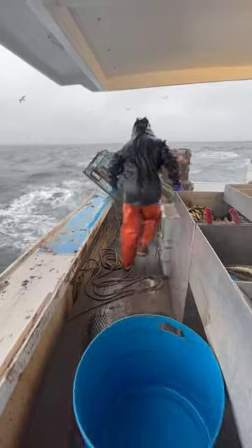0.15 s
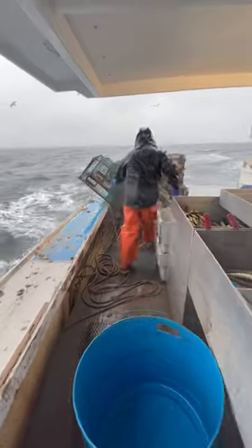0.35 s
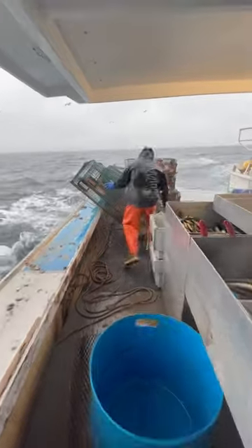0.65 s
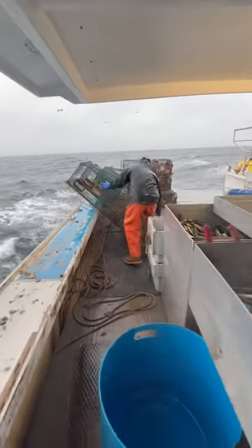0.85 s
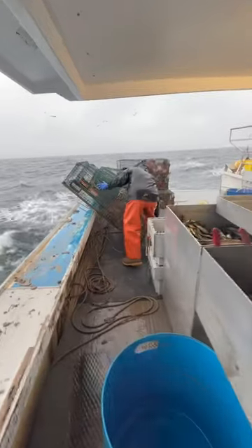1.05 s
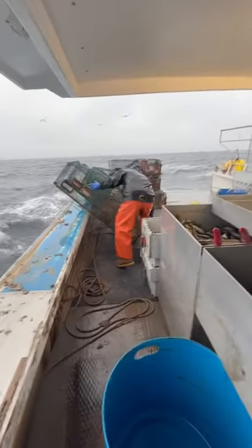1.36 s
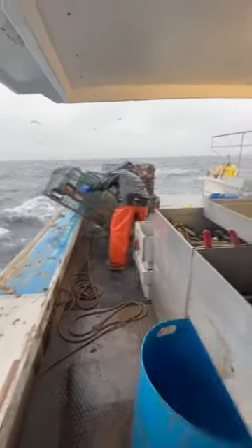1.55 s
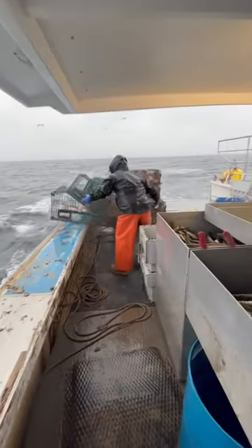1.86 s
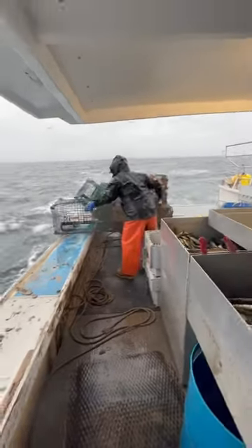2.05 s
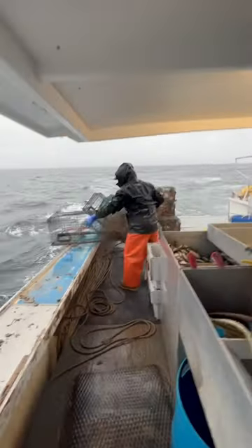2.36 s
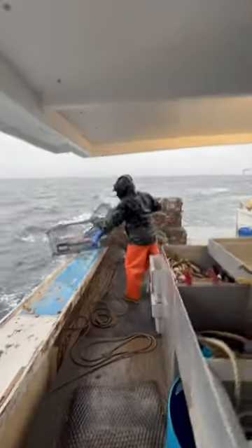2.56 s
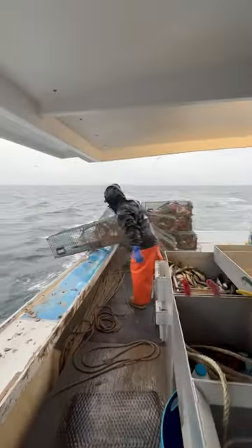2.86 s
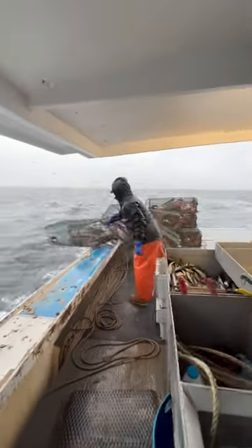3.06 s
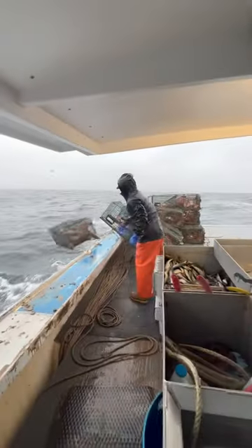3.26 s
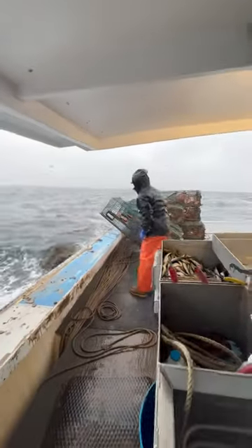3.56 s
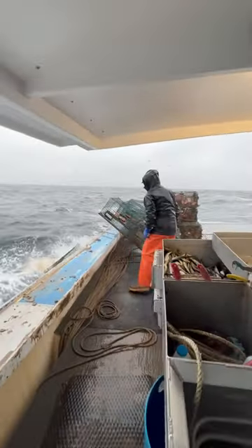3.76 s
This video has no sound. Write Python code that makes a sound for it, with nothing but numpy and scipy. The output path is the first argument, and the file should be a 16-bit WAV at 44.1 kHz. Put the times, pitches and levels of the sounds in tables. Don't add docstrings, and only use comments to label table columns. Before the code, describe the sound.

A wire trap clatters and scrapes on a wooden rail after two soft boot steps, then slides away with faint knocks; a diesel throbs throughout and wake hisses, heard close on a half-sheltered boat deck, in stereo.

```python
import sys
import numpy as np
from scipy import signal
from scipy.fft import rfft, irfft, next_fast_len
from scipy.io import wavfile
from scipy.ndimage import uniform_filter1d, map_coordinates

SR = 44100
rng = np.random.default_rng(int(sys.argv[2]) if len(sys.argv) > 2 else 0)


def rack_gain(trim_db):
    fader = np.asarray(trim_db, float)
    return 10 ** (fader / 20)


def materialize(psi):
    bounded = np.clip(np.atleast_2d(psi).T, -1, 1)
    quanta = np.round(bounded * 32767).astype(np.int16)
    wavfile.write(sys.argv[1], SR, quanta)


N = 172872

# cycle_multiple, level_db
ENGINE_ORDERS = [(1, -54.5), (2, -66), (3, -13), (4, -3.5), (5, -15.5), (6, -6.5), (7, 1.5), (8, -12.5),
                 (9, -33), (10, -15.5), (11, -16.5), (12, -22), (13, -43.5), (14, -26.5), (15, -25),
                 (16, -27.5), (17, -31.5), (18, -19.5)]
# time_s, level_db
HULL_BOOM = [(0, -18), (.6, -19), (1.1, -19), (1.5, -15), (1.9, -12), (2.4, -15), (2.8, -20), (3.2, -20),
             (3.7, -14), (3.92, -15)]
# pitch_hz, level_db
DRONE_COLOUR = [(25, -26), (45, -3), (110, -9), (190, -14.5), (270, -18), (400, -19), (900, -35),
                (1500, -42.5)]
# pitch_hz, width_hz, level_db
CASING_MODES = [(225.5, 9.1, 3), (260.7, 24, 2), (343, 34, -2.5), (477, 27.5, -10), (642, 42, -13),
                (831, 170, -13.5)]
# start_s, level_db, crack_db, deck_share (0-1),
# pitch_factor
BLOWS = [(0.226, -26, -3, 0.33, 1.24), (0.239, -28, -23, 0.45, 1.2), (.328, -30, -2, 0, 1.1),
         (0.947, -38, -13, 0.6, 1.3), (1.347, -12, -9, 0.04, 0.99), (1.359, -29, -15, 0.2, 0.99),
         (1.524, -18.5, 0, 0.26, 1.06), (1.543, -18, -3, 0.3, 1.01), (1.555, -18.5, -1.5, 0, .92),
         (1.57, -16, -7, 0.07, 0.9), (1.581, -13, -10, .05, .98), (1.6, -12.5, -13, 0.32, 0.87),
         (1.638, -17.5, -9, 0.83, 1.2), (1.655, -22, -17, 0.8, 1.05), (1.681, -16.5, -14, 0.34, 1.1),
         (1.703, -20, -10, 0.5, .9), (1.713, -13.5, -11, 0.4, 0.73), (1.731, -19.5, -22, 0.34, 1.1),
         (1.957, -19, -7.5, 0.75, 1.01), (1.966, -13.5, -18, 0.96, 0.98), (2.954, -31, -2, 0.9, 1.4),
         (2.973, -27, -17, 0.4, 0.99), (3.032, -29, -17, 0.3, 1.17), (3.073, -22.5, -26, 0.36, 1.05),
         (3.151, -28, -19, 0.55, 1.35)]
# pitch_hz, level_db, t60_s
RAIL_MODES = [(229, 1, 0.036), (361.5, -1, 0.088), (515.7, -3.5, 0.12), (640, -3, 0.14),
              (713.5, -1.5, 0.094), (827, 1, 0.031), (861, 1.5, 0.063), (938, -16.5, 0.046),
              (1162, -15.5, 0.11), (1412, -14, 0.14), (2240, -53, 0.13), (2834, -21, 0.22)]
# pitch_hz, level_db, t60_s
DECK_MODES = [(142, 5, 0.13), (299, -6, 0.07), (417, -2.5, 0.13), (487, -4.5, 0.12), (700, -2, 0.12),
              (796, -0.5, 0.049), (980, -4.5, 0.045), (1377, -13, 0.056)]
# pitch_hz, level_db
WIRE_COLOUR = [(500, 13.5), (1500, 0), (2700, -5.5), (4700, -7), (6300, -5), (9500, -9.5), (16000, -35)]
# pitch_hz, level_db
DULL_COLOUR = [(500, 7), (1300, 3.5), (2800, -7.5), (4000, -17.5), (9000, -24.5)]
# start_s, level_db, pitch_hz,
# driven_s, t60_s
HOLLOW_THUMPS = [(.2245, -19, 657, 0.0048, 0.033), (.232, -21.5, 814, 0.014, 0.04),
                 (.329, -33, 3450, .004, .025), (1.352, -20.5, 356, 0.032, .12),
                 (1.526, -14, 358.2, 0.089, 0.092), (1.7, -16, 379, 0.019, 0.076),
                 (1.705, -23, 739, .03, .06), (1.76, -25.5, 383, 0.03, 0.09),
                 (1.958, -12.5, 308.6, 0.028, 0.1), (2.05, -20, 337, 0.027, .1),
                 (3.151, -27.5, 1209, .003, 0.039), (3.1515, -31, 2380, .002, .025)]
# start_s, frame_db, fine_mesh_db
WIRE_TICKS = [(0.224, -31, -49), (0.311, -60, -41), (.3265, -31, -33), (1.3432, -18.5, -16),
              (1.459, -35, -45), (1.5243, -33, -33), (1.528, -25, -36), (1.544, -17, -22),
              (1.5482, -18, -19.5), (1.566, -23.5, -30), (1.569, -28, -20.5), (1.574, -26, -23),
              (1.578, -26, -30), (1.594, -26, -38), (1.6, -32, -30), (1.604, -31, -32), (1.641, -19, -36),
              (1.651, -29, -38), (1.658, -32, -34), (1.672, -39, -27), (1.676, -32, -36), (1.705, -29, -34),
              (1.724, -31, -44), (1.735, -40, -45), (1.959, -29, -40), (1.97, -40, -45), (1.9866, -32, -44),
              (3.15, -31, -43), (3.678, -40, -34), (3.683, -33, -43), (3.847, -35, -34)]
# pitch_hz, level_db
FRAME_COLOUR = [(700, -14), (1300, 1), (2600, -4), (3600, -1.5), (4800, -27)]
# pitch_hz, level_db
FINE_COLOUR = [(4500, -16), (6300, 2), (7500, -6.5), (9500, -2), (13000, -12)]
# start_s, length_s, level_db, dull_share (0-1), rail_db
SCRAPE_STROKES = [(0.214, 0.072, -38.5, 0.5, -33), (0.316, 0.075, -37, .1, -35),
                  (1.424, 0.053, -28, 0.74, -34), (1.513, 0.093, -23.5, 0.22, -25.5),
                  (1.609, 0.071, -26, 0.63, -25.5), (1.694, 0.046, -27.5, 0.79, -30),
                  (1.77, 0.067, -52, 0.8, -36), (1.99, 0.088, -42, 0.44, -30),
                  (2.928, 0.27, -45.5, 0, -30.5), (3.602, 0.13, -35, 0.15, -35),
                  (3.821, 0.075, -32.5, 0.56, -39)]
# pitch_hz, width_hz, level_db
MESH_MODES = [(3140, 26, -3), (3640, 80, 3), (6000, 320, -7), (7850, 20, -6), (8100, 270, -1)]
# pitch_hz, level_db
RASP_COLOUR = [(700, 1), (1600, -1.5), (3200, -3), (4200, -15.5)]
# start_s, level_db
BOOT_STEPS = [
    (.232, -19.5),
    (.33, -20.5),
]
# time_s, level_db
WAKE_STRENGTH = [(0, -41.5), (.2, -47), (.4, -47.5), (.5, -51), (.58, -44.5), (.81, -45.5), (.87, -49.5),
                 (1.2, -57.5), (1.33, -50), (1.41, -41.5), (1.93, -40.5), (2.15, -46), (2.6, -49.5),
                 (2.93, -50), (3.1, -47.5), (3.4, -44), (3.67, -37), (3.92, -38)]
# pitch_hz, level_db
HISS_COLOUR = [(700, 0.5), (1500, -5.5), (3000, -8), (4800, -10.5), (6200, -6.5), (8000, -11), (11000, -15),
               (16000, -17)]
# pitch_hz, level_db
BODY_COLOUR = [(200, -24), (600, 3.5), (1500, -8), (3500, -14), (6000, -63)]
# pitch_hz, level_db
SPRAY_COLOUR = [(4500, -10), (6500, -3), (10000, -2)]
# pitch_hz, t60_s
SHELTER_T60 = [(200, 0.5), (2000, 0.2), (10000, 0.21)]
# pitch_hz, side_over_mid_db
PORT_WIDTH = [(60, -34.5), (190, -22), (350, -13.5), (620, -1), (1500, -3), (3500, 2.5), (6400, -7.5),
              (9000, -2)]
# pitch_hz, share
PORT_LAG = [(200, 0.41), (1000, 0.83), (3000, 0.38), (6000, .6), (10000, 0.82)]
# pitch_hz, share
PORT_LEFT = [(100, 0.96), (300, 0.9), (600, 0.081), (1200, 0.017), (9000, 0.12)]

CYCLE_HZ, FIRST_PEAK_S = 15.03, 0.067
ENGINE_DB, BOOM_HZ, BOOM_WIDTH_HZ = -20, 99, 9.9
DRIFT_DB, DRIFT_RAD, HUNT_RAD = 1.3, 0.2, 0.04
DRONE_DB, DRONE_THROB, CASING_DB = -23.5, 0.049, -30.5
KNOCK_RISE_S, CRACK_S, RATTLE_S, RATTLE_DB = 0.00084, 0.01, 0.19, -3
MODE_SCATTER_DB = 1.2
THUMP_RISE_TURNS, THUMP_WAVER_RAD = 2, 0.25
TICK_RISE_S, TICK_T60_S = 0.00047, 0.017
SLIPS_PER_S, SLIP_DB, SLIP_S, SMOOTH = 600, 4, 0.0015, 1
STROKE_EDGE, MESH_DB = 0.23, -9.5
BOOT_RING = 1.5
HISS_DB, BODY_DB, BODY_GROWS, FIZZ = 2.5, -41, 0.29, 0.54
SPRAY_S, SPRAY_LENGTH_S, SPRAY_DB = 3.32, 0.52, -48
SHELTER_DB = -7
OVERLOAD, MID_TOP_HZ, CENTRE_CUT_HZ = 0.88, 11330, 11900


def unit(x):
    return x / np.sqrt(np.mean(x ** 2) + 1e-20)


def along(points, hz):
    f, v = np.transpose(points)
    return np.interp(np.log(hz + 1), np.log(f + 1), v)


def curve(rows):
    return np.interp(np.arange(N) / SR, *np.transpose(rows))


def wobble(rate):
    knots = rng.standard_normal(int(N * rate / SR) + 4)
    return map_coordinates(knots, [np.arange(N) * rate / SR])


def filtered(x, response):
    m = next_fast_len(N + SR // 2)
    return irfft(rfft(x, m) * response(np.fft.rfftfreq(m, 1 / SR)), m)[..., :N]


def coloured(x, spectrum):
    points = [(5, -90)] + list(spectrum) + [(22000, spectrum[-1][1] - 30)]
    return unit(filtered(x, lambda f: rack_gain(along(points, f))))


def resonate(x, peaks):
    def response(f):
        total = 0
        for k, (centre, width, db) in enumerate(peaks):
            damping = 1j * f * width
            total = total + (-1) ** k * rack_gain(db) * damping / (centre * centre - f * f + damping)
        return total
    return filtered(x, response)


def patchy(patchy_db):
    z = signal.stft(rng.standard_normal((2, N)), nperseg=512)[2]
    field = uniform_filter1d(rng.standard_normal(z.shape[1:]), size=6, axis=0)
    field = uniform_filter1d(field, size=12, axis=1)
    return signal.istft(z * rack_gain(patchy_db * unit(field)), nperseg=512)[1][:, :N]


def grit(per_s, scatter_db):
    size = (rng.random(N) < per_s / SR) * rack_gain(scatter_db * rng.exponential(size=N))
    return unit(size * rng.standard_normal((2, N)))


def ring(modes, t, pitch):
    total = 0
    for hz, db, t60 in modes:
        decay = rack_gain(db + rng.normal(0, MODE_SCATTER_DB) - 60 * t / t60)
        path_turns = [[0], [rng.random()]]
        total = total + decay * np.sin(2 * np.pi * (hz * pitch * t + path_turns))
    return total


def engine():
    order, order_db = np.transpose(ENGINE_ORDERS)
    cepstrum = irfft(np.interp(np.arange(257) / 8, order, order_db) * np.log(10) / 20)
    lag = np.imag(rfft(cepstrum[:256] * 2, 512))[::8]
    turn = 2 * np.pi * CYCLE_HZ * (np.arange(N) / SR - FIRST_PEAK_S) + HUNT_RAD * wobble(1.18)
    boom_db = curve(HULL_BOOM) - np.mean(curve(HULL_BOOM))
    near_boom = np.exp(-((order * CYCLE_HZ - BOOM_HZ) / BOOM_WIDTH_HZ) ** 2)
    throb = 0
    for k, db, near in zip(order, order_db, near_boom):
        level = rack_gain(db + near * boom_db + DRIFT_DB * (1.5 - near) * wobble(4.42))
        throb = throb + level * np.cos(k * turn - lag[int(k)] + DRIFT_RAD * wobble(2.8))
    throb = throb * np.sqrt(2) * rack_gain(ENGINE_DB)
    gate = 1 + DRONE_THROB * np.cos(turn - 1.5)
    rumble = rack_gain(DRONE_DB) * coloured(patchy(patchy_db=1.2), DRONE_COLOUR)
    casing = rack_gain(CASING_DB) * unit(resonate(patchy(patchy_db=1.5), CASING_MODES))
    return throb + gate * rack_gain(0.96 * wobble(3.75)) * (rumble + casing)


def knocks():
    wood, crack = np.zeros((2, N + SR)), np.zeros((2, N + SR))
    t = np.arange(SR // 4) / SR
    for s, db, crack_db, deck, pitch in BLOWS:
        deck, at = np.clip(deck, 0, 1), round(s * SR)
        struck = (1 - deck) * ring(RAIL_MODES, t, pitch) + deck * ring(DECK_MODES, t, pitch)
        wood[:, at:at + len(t)] += rack_gain(db) * (1 - np.exp(-t / KNOCK_RISE_S)) * struck
        burst = rack_gain(-60 * t / CRACK_S / 2) + rack_gain(RATTLE_DB - 60 * t / RATTLE_S)
        crack[:, at:at + len(t)] += np.outer([(1 - deck) ** 2, deck], rack_gain(db + crack_db) * burst)
    out = wood[:, :N]
    for envelope, colour in zip(crack, (WIRE_COLOUR, DULL_COLOUR)):
        out = out + envelope[:N] * coloured(rng.standard_normal((2, N)), colour)
    return out


def thumps():
    out, t = np.zeros((2, N)), np.arange(SR // 4) / SR
    waver = THUMP_WAVER_RAD * wobble(40)
    for s, db, hz, driven_s, t60 in HOLLOW_THUMPS:
        at = round(s * SR)
        swell = 1 - np.exp(-t * hz / THUMP_RISE_TURNS)
        decay = rack_gain(db - 60 * np.maximum(t - driven_s, 0) / t60)
        phase = 2 * np.pi * (hz * t + [[0], [rng.random()]]) + waver[at:at + len(t)]
        out[:, at:at + len(t)] += swell * decay * np.sin(phase)
    return out


def ticks():
    hits, t = np.zeros((2, N)), np.arange(SR // 20) / SR
    snap = 1.62 * (1 - np.exp(-t / TICK_RISE_S)) * rack_gain(-60 * t / TICK_T60_S)
    for s, frame_db, fine_db in WIRE_TICKS:
        at = round(s * SR)
        hits[:, at:at + len(t)] += np.outer(rack_gain([frame_db, fine_db]), snap)
    out = 0
    for hit, colour in zip(hits, (FRAME_COLOUR, FINE_COLOUR)):
        out = out + hit * coloured(rng.standard_normal((2, N)), colour)
    return out


def scrapes():
    t = np.arange(N) / SR
    kicks = (rng.random(N) < SLIPS_PER_S / SR) * rack_gain(SLIP_DB * rng.standard_normal(N))
    clumps = unit(signal.lfilter([1], [1, -np.exp(-1 / (SLIP_S * SR))], kicks))
    slips = (clumps + SMOOTH) * rng.standard_normal((2, N))
    bright = coloured(slips, WIRE_COLOUR) + rack_gain(MESH_DB) * unit(resonate(slips, MESH_MODES))
    dull = coloured(slips, RASP_COLOUR)
    rail = unit(resonate(slips, [(hz, 6.3 / t60, db) for hz, db, t60 in RAIL_MODES]))
    out = np.zeros((2, N))
    for s, length, db, share, rail_db in SCRAPE_STROKES:
        u, share = (t - s) / length, np.clip(share, 0, 1)
        fade_in = np.clip(u / STROKE_EDGE, 0, 1)
        fade_out = np.clip((1 + STROKE_EDGE / 2 - u) / STROKE_EDGE, 0, 1)
        stroke = np.sin(np.pi / 2 * fade_in * fade_out) ** 2
        out += stroke * (rack_gain(db) * ((1 - share) * bright + share * dull) + rack_gain(rail_db) * rail)
    return out


def boots():
    out, t = np.zeros((2, N)), np.arange(SR // 2) / SR
    planks = [(hz, db, t60 * BOOT_RING) for hz, db, t60 in DECK_MODES[3:6]]
    press = 1 - np.exp(-t / (2.4 * KNOCK_RISE_S))
    for s, db in BOOT_STEPS:
        at = round(s * SR)
        out[:, at:at + len(t)] += rack_gain(db) * press * ring(planks, t, pitch=0.97)
    return out


def wake():
    strength_db = curve(WAKE_STRENGTH)
    hiss = coloured(patchy(patchy_db=2.0) + FIZZ * grit(2500, scatter_db=-0.5), HISS_COLOUR)
    body = coloured(patchy(patchy_db=-1.0), BODY_COLOUR)
    hiss_gain = rack_gain(strength_db + HISS_DB + 1.4 * wobble(12))
    body_gain = rack_gain(BODY_DB + BODY_GROWS * (strength_db - strength_db.mean()))
    return hiss_gain * hiss + body_gain * body


def spray():
    swell = np.exp(-((np.arange(N) / SR - SPRAY_S) / SPRAY_LENGTH_S) ** 2)
    return rack_gain(SPRAY_DB) * swell * coloured(rng.standard_normal((2, N)), SPRAY_COLOUR)


def shelter(x):
    hz, t, z = signal.stft(rng.standard_normal((2, SR // 3)), SR, nperseg=256)
    decay = rack_gain(-60 * t / along(SHELTER_T60, hz)[:, None])
    tail = signal.istft(z * decay, SR, nperseg=256)[1]
    delayed = np.pad(x, (400, 0))[None]
    return signal.fftconvolve(delayed, tail / np.linalg.norm(tail[0]), axes=1)[:, :N]


def ports(pair):
    def lean(f):
        share = np.clip(along(PORT_LAG, f), 0, 1)
        related = along(PORT_LEFT, f) - 1j * share
        unrelated = -1j * np.sqrt(1 - share ** 2)
        return rack_gain(along(PORT_WIDTH, f)) * np.array([related, unrelated])
    side = filtered(pair, lean).sum(0)
    return np.array([pair[0] + side, pair[0] - side])


def scene():
    trap = knocks() + scrapes() + boots() + ticks() + thumps()
    answer = rack_gain(SHELTER_DB) * shelter(trap[0])
    return ports(engine() + wake() + trap + answer + spray())


def roll_off(x):
    return signal.sosfilt(signal.butter(12, 15800, fs=SR, output="sos"), x)


def record(dry):
    x = dry / (1 + abs(dry / OVERLOAD) ** 4) ** (1 / 4)
    mid, side = (x[0] + x[1]) / 2, (x[0] - x[1]) / 2
    mid = filtered(mid, lambda f: (f < CENTRE_CUT_HZ) / (1 + (f / MID_TOP_HZ) ** 30))
    return roll_off(np.array([mid + side, mid - side]))


dry = scene()
out = record(dry)
materialize(out)
```